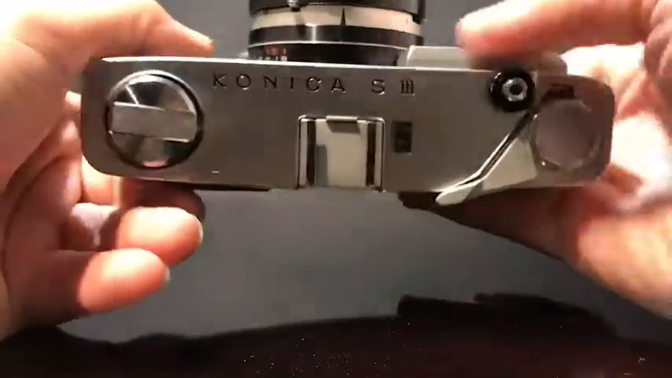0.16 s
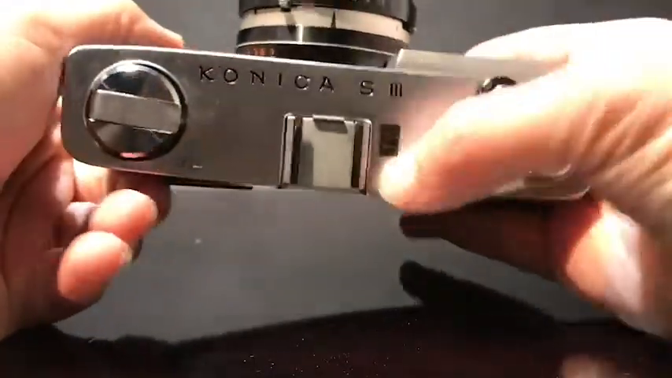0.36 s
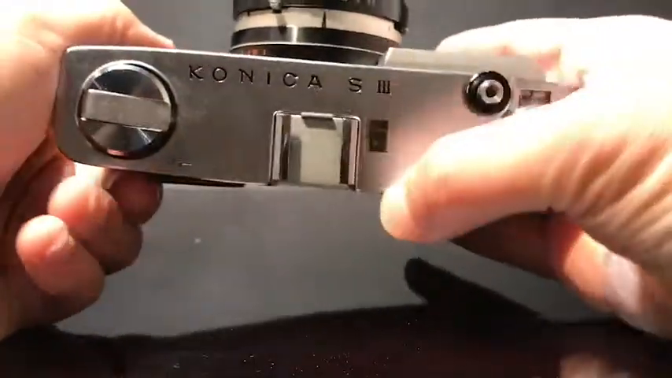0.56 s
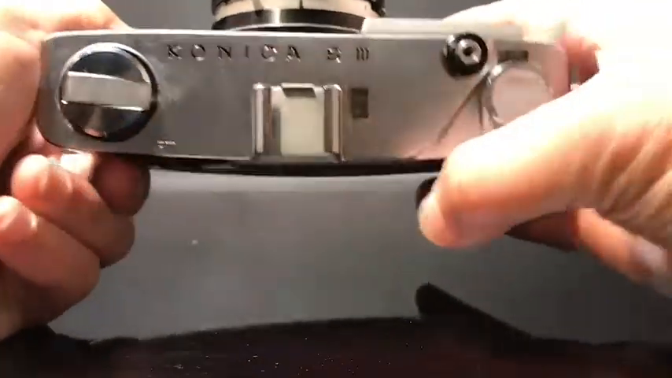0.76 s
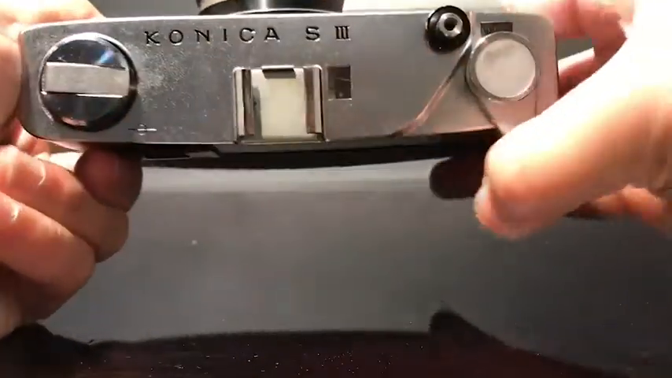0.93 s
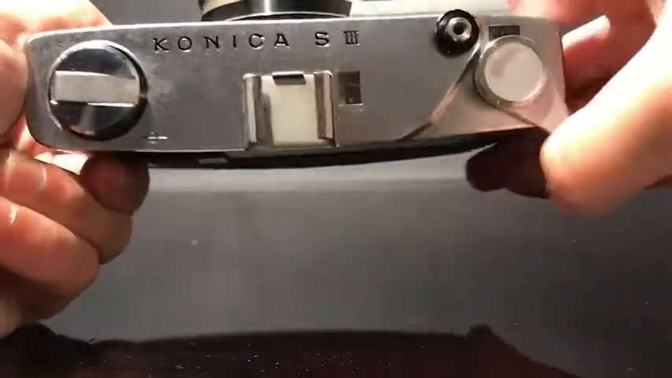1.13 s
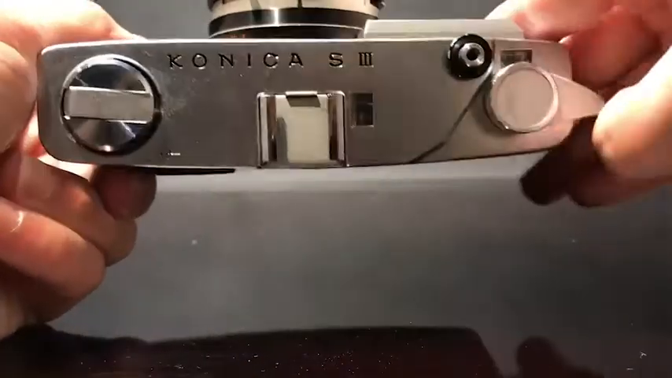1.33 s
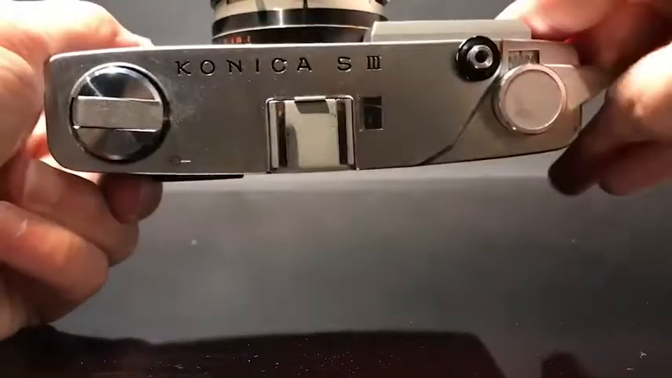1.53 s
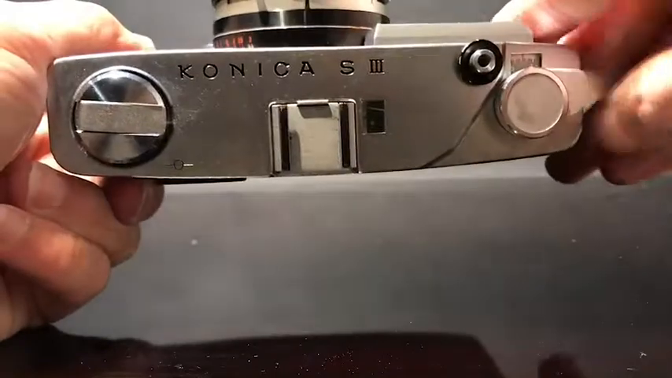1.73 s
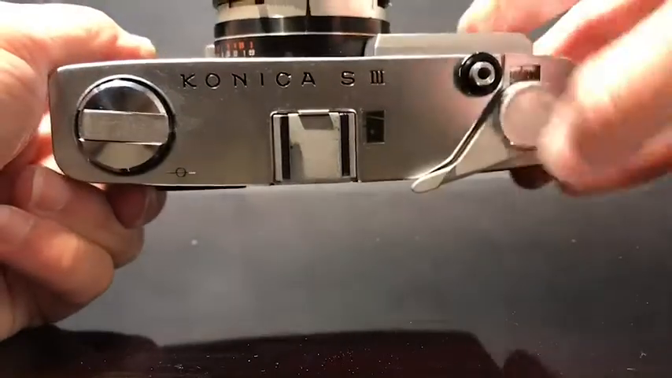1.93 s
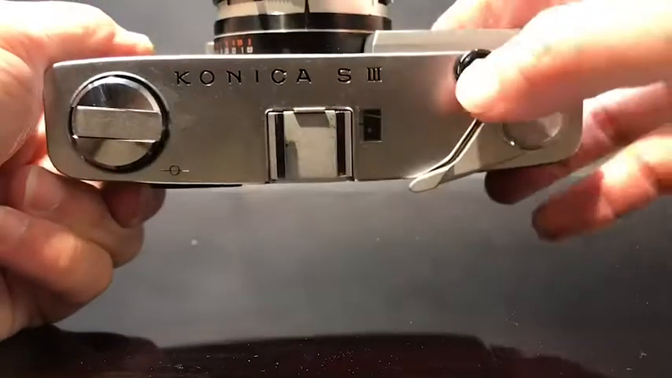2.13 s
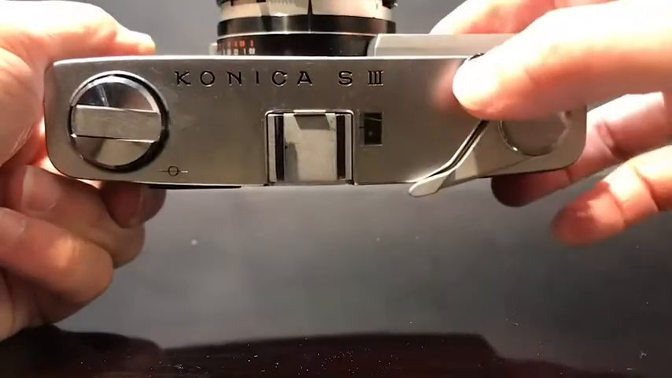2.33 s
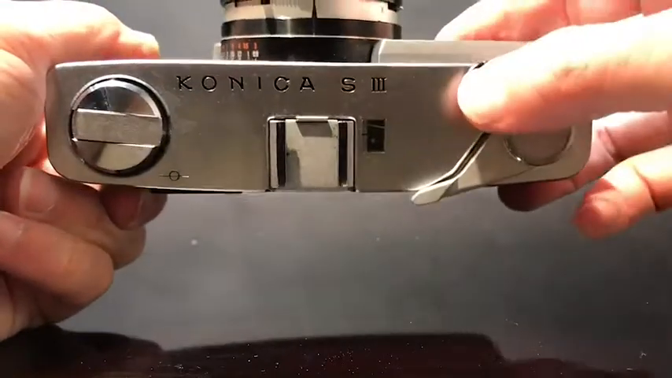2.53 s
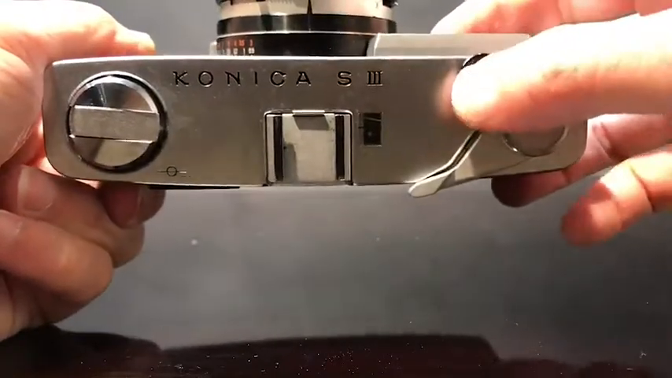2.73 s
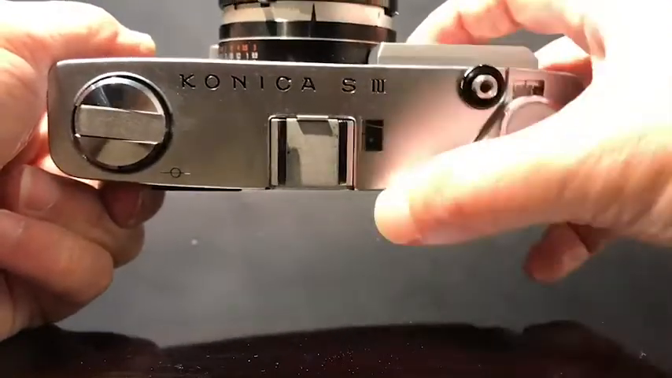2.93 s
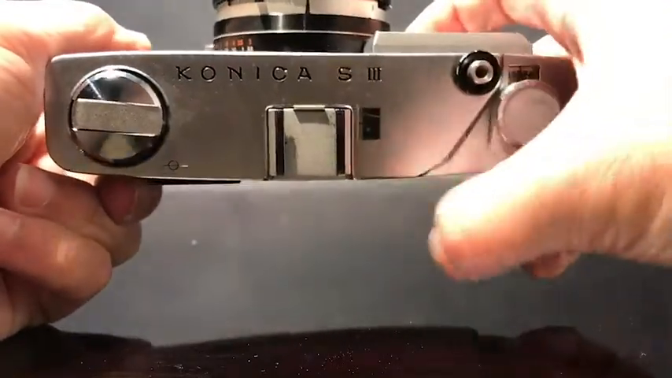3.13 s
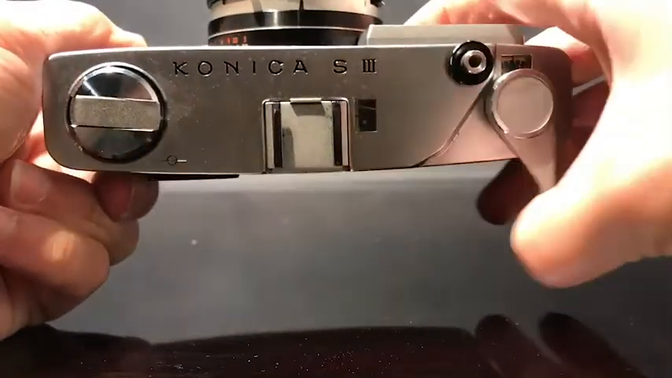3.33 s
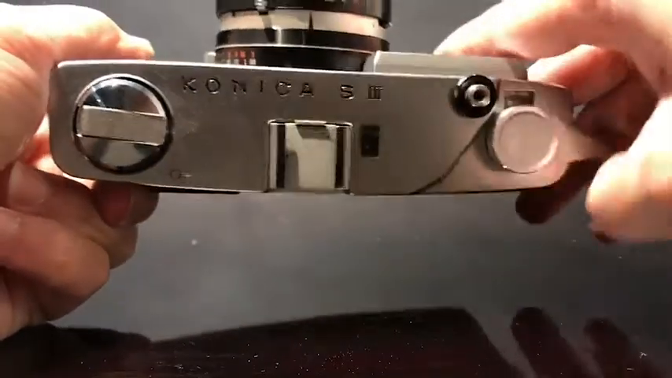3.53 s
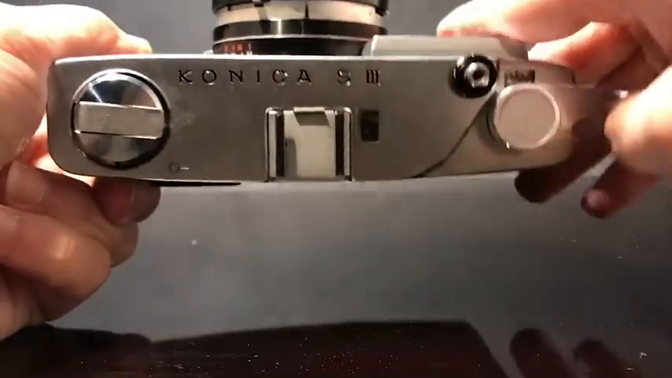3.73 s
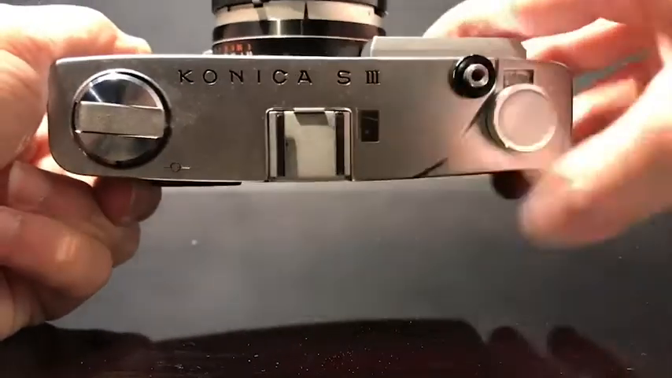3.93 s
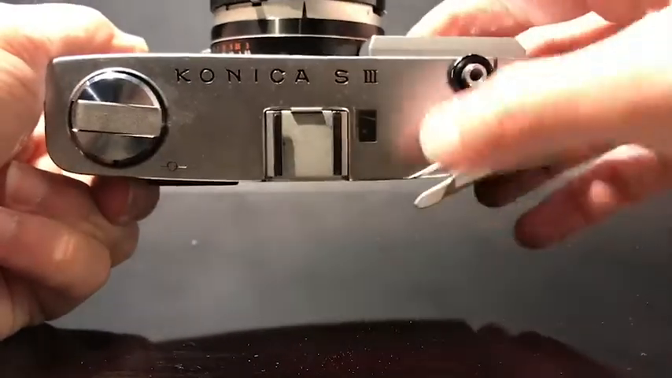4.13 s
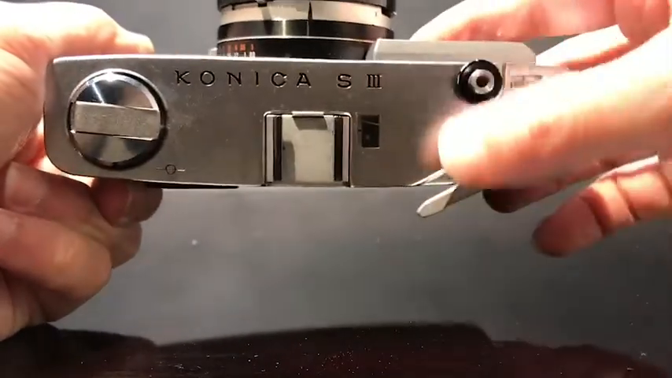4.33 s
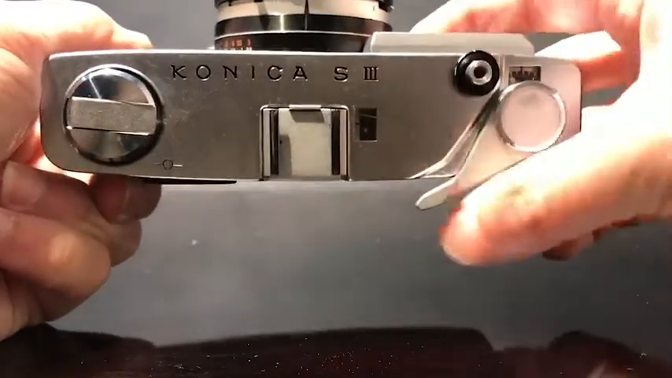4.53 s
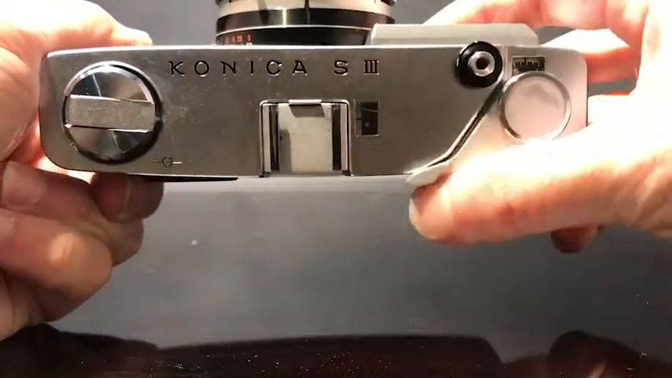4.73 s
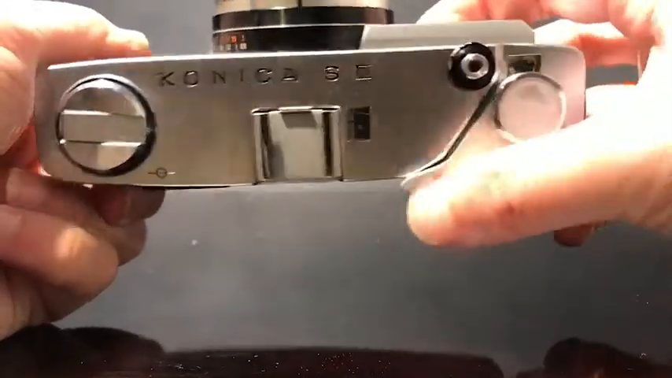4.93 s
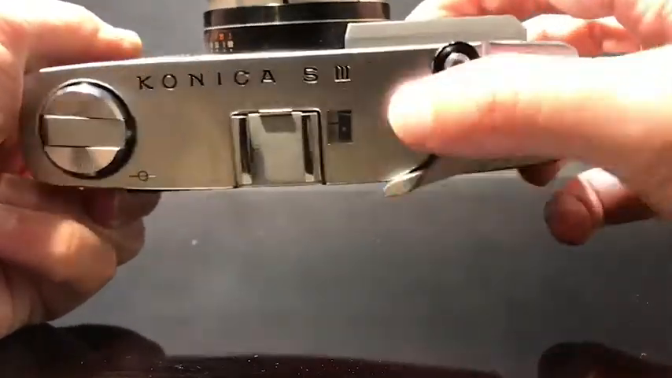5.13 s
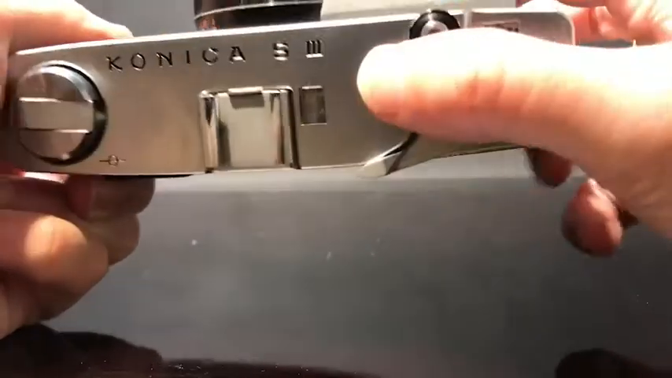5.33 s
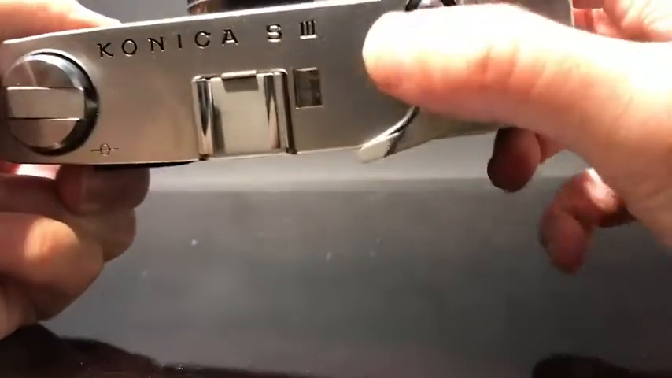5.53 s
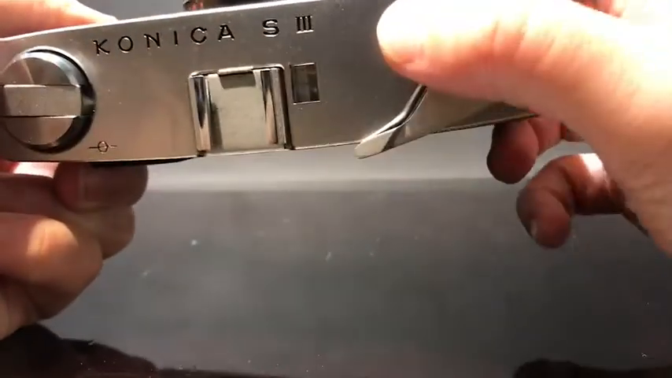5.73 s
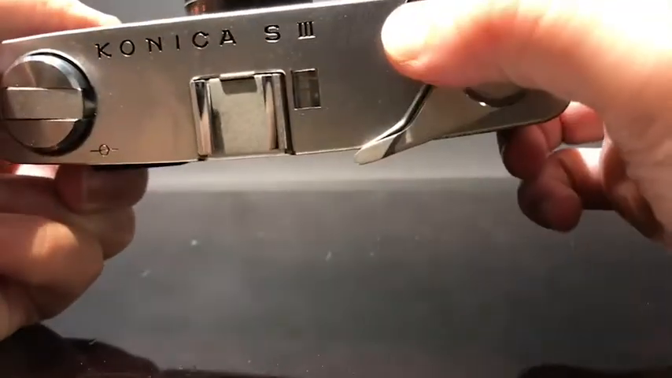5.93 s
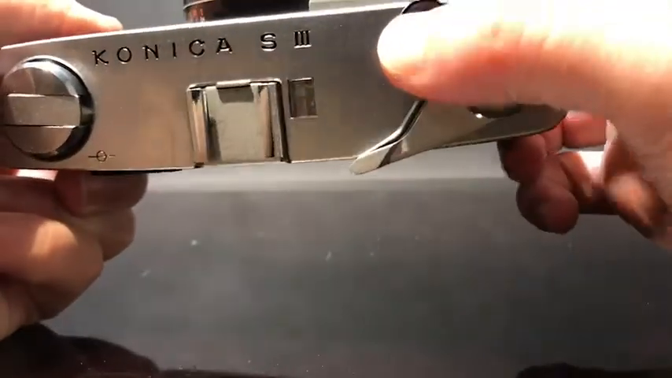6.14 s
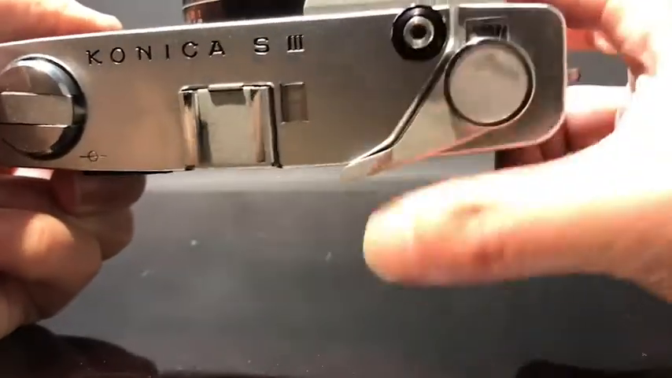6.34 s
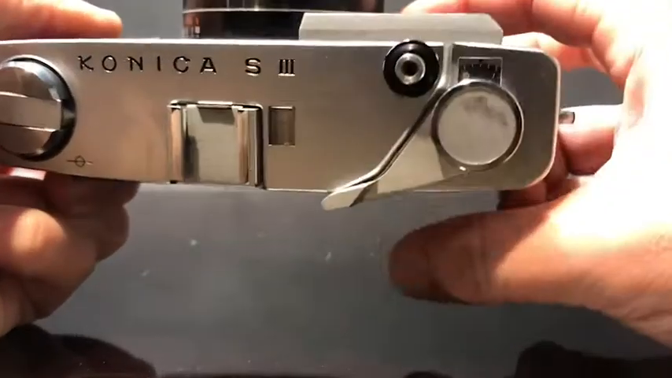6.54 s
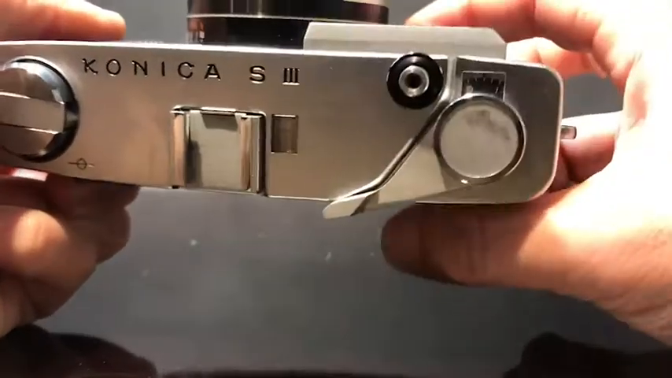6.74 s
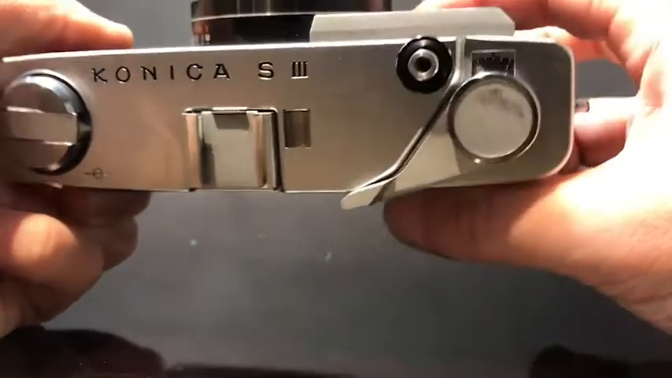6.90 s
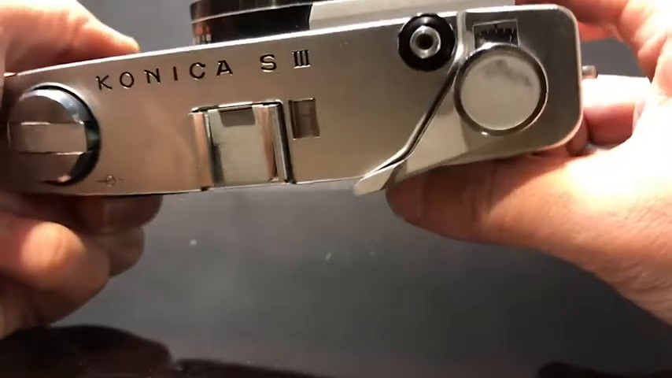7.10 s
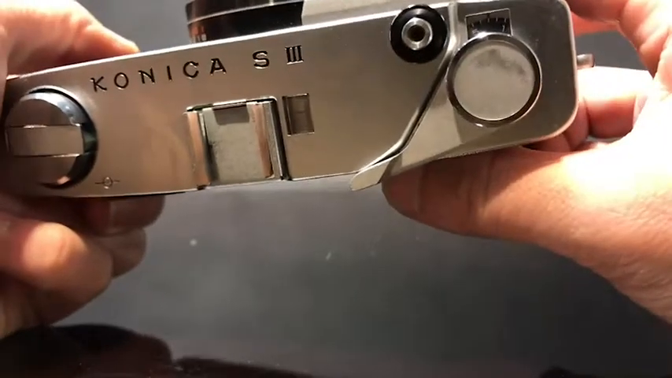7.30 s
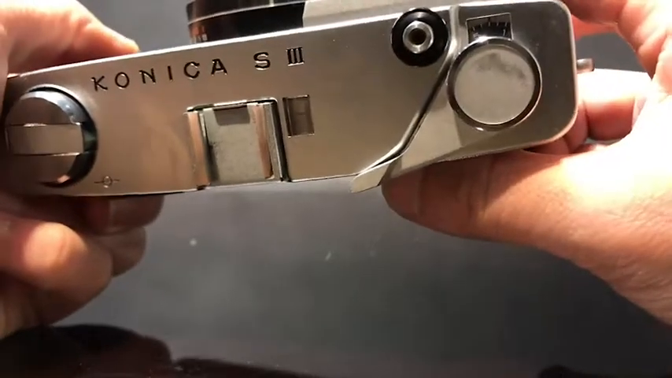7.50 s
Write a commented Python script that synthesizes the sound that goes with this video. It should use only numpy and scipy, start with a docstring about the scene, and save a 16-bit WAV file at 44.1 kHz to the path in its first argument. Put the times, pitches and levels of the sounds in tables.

```python
"""Winding and firing a film camera

A metal camera is worked close to a small microphone in a quiet room. The winding lever ticks over
its ratchet and snaps home, thumping the microphone; the shutter runs and slams; the release springs
back; fingers rub the body. Most metal sounds are a tap plus a burst of noise ringing in the body."""
import sys
import numpy as np
from scipy import signal
from scipy.fft import rfft, irfft
from scipy.io import wavfile

SR = 44100
rng = np.random.default_rng(int(sys.argv[2]) if len(sys.argv) > 2 else 0)


def store_pcm(level_fs):
    """Save levels as 16-bit WAV."""
    pcm = np.round(np.clip(level_fs, -1, 1) * 32767).astype(np.int16)
    wavfile.write(sys.argv[1], SR, np.atleast_2d(pcm).T)


N = 333660

# The room's steady noise: (frequency [Hz], relative level [dB])
ROOM_SPECTRUM = [(12, -28.5), (20, -6.5), (60, 0.5), (91, -20), (130, -2), (168, -21), (198, -7),
                 (328, -19), (388, -10.5), (422, -36), (624, -20.5), (1660, -25.5), (2530, -27.5),
                 (14300, -42.5), (16000, -57)]
ROOM_DB, CUTOFF_HZ = -56.5, 16350
# Hands on the camera: (time [s], grip creak [dB], finger rub [dB], skin hiss [dB])
HANDS = [(0.0, -58.5, -61, -64), (0.44, -60, -62, -67.5), (0.52, -58, -58, -61.5), (0.66, -58, -62.5, -65),
         (0.84, -62.5, -61, -72), (1.6, -64.5, -70, -67.5), (1.98, -61, -64, -63), (2.11, -61, -54.5, -59),
         (2.42, -58.5, -60, -69), (2.9, -57.5, -70, -66), (3.12, -57.5, -63, -78), (3.7, -60, -66.5, -67),
         (4.0, -55, -78, -67.5), (4.36, -60, -48, -66), (4.5, -58, -62, -69), (4.58, -59, -62.5, -59.5),
         (4.68, -60, -71.5, -67), (5.039, -61, -70.5, -79), (6.0, -66.5, -69.5, -77),
         (7.18, -64.5, -69, -90.5), (7.35, -65, -64, -63.5), (7.57, -65, -66, -69)]
# Gears rub as the lever winds, loudest as the stroke ends:
# (start [s], a point in mid-stroke [s], end [s], level at each of these [dB])
WINDING_STROKES = [(0.923, 1.24, 1.44, -61.5, -56.5, -53), (3.18, 3.5, 3.635, -57, -58.5, -50.5)]
# Added to the gears' level: (creak [dB], rub [dB], hiss [dB])
GEAR_COLOUR_DB = [-8, -2.5, -2]
# The grip creaks on the covering: (start [s], length [s], level [dB], pitch [Hz], width [Hz])
CREAKS = [(0.166, 0.096, -48, 270, 60), (0.456, 0.05, -47, 394, 200), (.485, 0.078, -43, 201, 197),
          (0.589, .12, -53, 400, 300), (1.193, .15, -59, 700, 300), (3.177, 0.062, -47.5, 670, 200),
          (3.441, .11, -43.5, 700, 248), (3.56, 0.1, -50.5, 700, 300), (3.975, .08, -46.5, 420, 300),
          (4.261, 0.059, -41.5, 220, 202), (4.928, 0.079, -57, 930, 590)]
# The lever slams home. A "fade" is always the time to die away by 60 dB.
# (time [s], knock [dB], boom [dB], first pitch [Hz], last pitch [Hz], glide [s], fade [s])
THUMPS = [(1.8464, -15, 1.5, 376, 50.8, 0.0027, 0.077), (3.973, -16.5, -15, 680, 59.9, 0.0031, 0.049)]

# Where the camera's body rings: (pitch [Hz], width [Hz], level [dB])
BODY_RINGS = [(665, 260, 1), (1135, 350, 1), (1450, 830, 3.5), (2390, 130, 1.5), (2890, 240, 2),
              (3700, 800, 3), (4375, 190, -2), (5420, 400, -4), (6330, 500, -5), (7530, 2200, -0.5),
              (9070, 1100, -3.5), (10000, 6100, -5.5), (11450, 1700, -2.5), (13770, 900, -2),
              (17300, 320, 4)]
# Five pitch ranges, highest first: (lower edge [Hz]). A "colour" adds a level to each range.
RANGE_EDGES_HZ = [9000, 4500, 3100, 1800, 0]
# A "tilt" makes a sound brighter (+) or duller (-): (share of the tilt in each range)
TILT_SHARE = [0.73, 0.87, 0, -0.16, -0.42]
# The room's echo in each range: (level [dB]) and (fade [s])
ECHO_DB = [-43.5, -44.5, -40, -43, -46]
ECHO_FADE_S = [0.2, 0.26, 0.32, 0.21, 0.25]
# Colours of the pawl (the ratchet's catch) and of sliding parts: (level in each range [dB])
PAWL_COLOUR_DB = [-1.5, -14, -17.5, -23, -23.5]
SLIDE_COLOUR_DB = [3, 3, -1, -2, -2.5]
# Kinds of hit: (colour [dB], fade of the chatter [s])
TICK_HIT = [1, -1.5, -13, -17, -19], 0.016
HOME_HIT = [4.5, -0.5, -6.5, -7, -7], .01
LATCH_HIT = [-3.5, -5, -6, -15, -13.5], .02
FINGER_HIT = [1, 1, 2, 1.5, -2.5], 0.013
FIRST_BLADE_HIT = [-0.5, -2, -14, -23.5, -18.5], .007
SECOND_BLADE_HIT = [3.5, -2, -2, -16.5, -16.5], 0.0089
BOUNCE_HIT = [-1, -2.5, -4, -10.5, -10.5], 0.019
ROD_HIT = [-0.5, -3, -15, -0.5, -23], 0.0078
# How far a hit's clean tap stands above its chatter: (level in each range [dB])
TAP_BOOST_DB = [5.99, 13.4, 3.8, 9.1, 20.24]

# The pawl drops over a ratchet tooth: (time [s], level [dB])
RATCHET_TICKS = [(0.83, -22.5), (0.862, -22.5), (0.892, -23.5), (0.9326, -21.5), (0.974, -24),
                 (0.9928, -20), (1.0104, -22), (1.0449, -23), (1.08, -22.5), (1.114, -23.5), (1.17, -24),
                 (1.1961, -21.5), (1.1994, -19.5), (1.217, -21), (1.2272, -21.5), (1.2354, -25),
                 (1.2612, -26.5), (1.286, -21), (1.3075, -16.5), (1.3391, -20), (1.3798, -24.5),
                 (1.4113, -20), (1.4325, -21.5), (3.202, -22.5), (3.2282, -21.5), (3.254, -21),
                 (3.288, -23), (3.3239, -24), (3.3433, -20), (3.3495, -21.5), (3.3753, -23.5),
                 (3.4054, -23), (3.4234, -21), (3.429, -23), (3.4449, -20), (3.46, -22.5), (3.474, -20),
                 (3.486, -21.5), (3.4954, -14.5), (3.507, -30), (3.5225, -17), (3.5383, -22),
                 (3.5677, -19.5), (3.5952, -20.5), (3.614, -22), (3.6214, -29)]
PAWL_WEIGHT, PAWL_VARIES_DB = .8, 2.5   # harder ticks sound fuller; each tooth has its own colour
# The pawl's spring: (pitch [Hz], width [Hz], level [dB])
PAWL_SPRING = (6500, 300, -21)
# The shutter spring latches in mid-stroke: (time [s], level [dB])
LATCHES = [(1.3105, -25), (3.5246, -23.5)]
# That spring rings on: (pitch [Hz], fade [s], added level [dB])
LATCH_RING = (3400, .12, -9)
# The free lever takes up slack or skips back over its teeth: (time [s], level [dB], tilt [dB])
LEVER_TICKS = [(0.7109, -29, -0.5), (1.741, -62, 9), (1.7804, -54, -1), (1.8331, -19, -1),
               (1.8388, -21, -12), (3.1171, -27.5, 1), (3.837, -53.5, 2.5), (3.875, -54, 1.5),
               (3.897, -50.5, 0.5), (3.9369, -25.5, 1.5), (3.953, -27, 5), (3.9637, -25, -2.5),
               (3.9686, -24, 2.5), (4.723, -21.5, 3)]
# The lever hits its rest: (time [s], snap [dB], chatter [dB])
LEVER_HOME = [(1.8445, -5, -14.5), (1.8466, -3.5, -13.5), (3.9726, -1, -11)]
SNAP_HALF_WIDTH_S, SNAP_LAG_S = .00006, .0009   # the snap comes just after the chatter starts
# A finger taps or presses the metal: (time [s], level [dB], tilt [dB])
PRESSES = [(0.3145, -53.5, -20), (1.8228, -44, 4), (2.3735, -61, 6), (4.206, -44, 7.5),
           (4.266, -41.5, -7.5), (4.2713, -27, -5)]
# Parts sliding: (start [s], end [s], start level [dB], end level [dB], tilt [dB])
SLIDES = [(3.448, 3.538, -49.5, -47, 2), (3.976, 3.983, -50, -33.5, -16), (4.268, 4.316, -34, -47.5, -15.5),
          (4.968, 4.994, -72, -70, 10), (5.741, 5.769, -63.5, -52.5, 0.5)]

# The shutter fires: (time [s], first blade [dB], second blade [dB], delay of the bounce [s])
FIRINGS = [(2.5288, -10.5, -8, .0116), (5.9652, -3.5, -9.5, .0155)]
RUN_UP_S, RUN_UP_DB, GEAR_TEETH_HZ = .0235, (-37.5, -32.5), 370   # gears buzz before the slam
SECOND_BLADE_LAG_S, BOUNCE_DB = 0.0016, -19.5
RATTLE_S, RATTLE_DB = (0.0028, 0.0073), (-35.5, -46)   # after the bounce: (from, to)
# The housing answers each slam: (pitch [Hz], fade [s], level [dB], delay [s])
SHUTTER_KNOCK = (600, 0.03, -23.5, .0025)
# The release springs back: (time [s], level [dB], lead of the latch tick [s], tick [dB], bounce [dB])
SPRING_BACK = [(2.7777, -9, 0.0021, -16.5, -27), (4.3202, -8.5, .002, -30.5, -21.5),
               (6.214, -8, 0.0052, -33.5, -12)]
CREEP_S, CREEP_DB = 0.038, (-61.5, -50.5)   # the rod creeps up before it lets go
ROD_BOUNCE_S, SETTLE_S, SETTLE_DB = .0045, (.01, 0.023), (-42.5, -47.5)
# The release rod knocks on its stop:
# (time [s], level [dB], pitch ratio set by the finger's grip, hardness [dB per octave])
ROD_KNOCKS = [(0.3165, -40, 1.004, -9.5), (2.7783, -7.5, 1.015, 4), (4.322, -11, 1.03, 3.5),
              (6.2153, -8.5, 1.155, 2)]
# The rod's own tones: (pitch [Hz], level [dB], fade [s])
ROD_TONES = [(620, -17, 0.051), (1085, -5, 0.029), (2235, 0, .015), (2742, -0.5, 0.013), (5330, -4, 0.011),
             (7870, 3.5, 0.0057), (9720, 0, .007), (2245, -29, 0.17), (2780, -29.5, 0.14)]


def from_db(db):
    """Turn decibels into a number to multiply by."""
    return 10 ** (np.asarray(db) / 20)


def rms_one(x):
    """Scale a sound to an average strength (rms) of 1."""
    return x / np.sqrt(np.mean(x ** 2) + 1e-20)


def band(x, low_hz, high_hz):
    """Keep what lies between two frequencies."""
    return signal.sosfilt(signal.butter(2, [low_hz, high_hz], "band", fs=SR, output="sos"), x)


def resonance(x, hz, width_hz):
    """Make a sound ring near one pitch; noise comes out equally strong at any width."""
    r = np.exp(-np.pi * width_hz / SR)
    gain = np.sqrt((1 - r * r) / 8)
    return signal.lfilter([gain, 0, -gain], [1, -2 * r * np.cos(2 * np.pi * hz / SR), r * r], x + 1e-18)


def ring(hz, fade_s):
    """A pure tone that dies away."""
    t = np.arange(int(.16 * SR)) / SR
    return np.sin(2 * np.pi * hz * t) * from_db(-60 * t / fade_s)


def room_tone():
    """Steady ventilation rumble and microphone hiss."""
    hz = np.maximum(np.fft.rfftfreq(N, 1 / SR), 1)
    points_hz, points_db = np.transpose(ROOM_SPECTRUM)
    shape = from_db(np.interp(np.log(hz), np.log(points_hz), points_db))
    return from_db(ROOM_DB) * rms_one(irfft(rfft(rng.standard_normal(N)) * shape, N))


def rubbing():
    """Hands and winding gears rub, making grainy low, middle and high noise."""
    times, *levels_db = np.transpose(HANDS)
    t = np.arange(N) / SR
    gears = sum(from_db(np.interp(t, row[:3], row[3:], left=-200, right=-200))
                for row in WINDING_STROKES)
    creak, rub, hiss = (np.hypot(from_db(np.interp(t, times, db)), from_db(gear_db) * gears)
                        for db, gear_db in zip(levels_db, GEAR_COLOUR_DB))
    slips = rng.standard_normal((3, N))
    slips *= from_db(2.7 * rng.standard_normal((3, N // 128 + 1))).repeat(128, axis=1)[:, :N]   # grain
    return (creak * rms_one(band(slips[0], 91, 730)) + rub * rms_one(band(slips[1], 600, 3500))
            + hiss * rms_one(band(slips[2], 3200, 14000)))


def creaks():
    """The grip sticks and slips: dull noise that swells and fades."""
    out = np.zeros(N)
    for start, length, db, hz, width_hz in CREAKS:
        i, size = round(start * SR), round(length * SR)
        rough = rms_one(resonance(rng.standard_normal(SR // 4), hz, width_hz))[:size]
        out[i:i + size] += from_db(db) * rough * np.sqrt(np.hanning(size))
    return out


def room_echo(chatter, taps):
    """How strong the echo is in each range: the room stores energy and lets it die away."""
    decays = from_db(-120 / (np.array(ECHO_FADE_S) * SR))
    build = np.exp(-1 / (0.0023 * SR))   # the first reflections take a moment to arrive
    stored = [signal.lfilter([1 - build], np.convolve([1, -decay], [1, -build]), power + 1e-18)
              for decay, power in zip(decays, chatter ** 2 + taps ** 2)]
    return from_db(ECHO_DB)[:, None] * np.sqrt(np.abs(stored))


def plucked_spring(events, hz, width_hz, gain_db, fade_s):
    """Each pluck sets a spring sizzling: fading noise around one pitch."""
    plucks = np.zeros(N)
    for s, db in events:
        plucks[round(s * SR)] = from_db(db + gain_db)
    shiver = signal.lfilter([1], [1, -from_db(-60 / (fade_s * SR))], plucks + 1e-18)
    return resonance(shiver * rng.standard_normal(N), hz, width_hz)


def springs():
    """The pawl's spring pings at each tooth; the shutter's spring rings thinly as it latches."""
    pawl = plucked_spring(RATCHET_TICKS, *PAWL_SPRING, fade_s=0.06)
    hz, fade_s, db = LATCH_RING
    return pawl + plucked_spring(LATCHES, hz, width_hz=250, gain_db=db, fade_s=fade_s)


def shutter_knock():
    """The housing rings dully just after the blades slam and bounce."""
    out = np.zeros(N)
    hz, fade_s, db, lag = SHUTTER_KNOCK
    knock = ring(hz, fade_s)
    for s, _, _, delay in FIRINGS:
        for start, loss_db in ((s + lag, 0), (s + lag + delay, -5)):
            i = round(start * SR)
            out[i:i + len(knock)] += from_db(db + loss_db) * knock
    return out


def lever_thumps():
    """The returning lever jolts the microphone: a dull knock and a tone that drops fast to a boom."""
    out, t = np.zeros(N), np.arange(int(.2 * SR)) / SR
    knock = ring(hz=900, fade_s=0.011)
    for s, knock_db, boom_db, first_hz, last_hz, glide_s, fade_s in THUMPS:
        hz = last_hz + (first_hz - last_hz) * np.exp(-t / glide_s)
        boom = np.sin(2 * np.pi * np.cumsum(hz) / SR) * (1 - np.exp(-t / 0.0018))
        i = round(s * SR)
        out[i:i + len(t)] += from_db(boom_db - 60 * t / fade_s) * boom
        out[i:i + len(knock)] += from_db(knock_db) * knock
    return out


def lever_snaps():
    """Each stop of the lever sends out one short swing of air pressure, down then up."""
    out, x = np.zeros(N), np.arange(-40, 41) / SR / SNAP_HALF_WIDTH_S
    for s, snap_db, _ in LEVER_HOME:
        i = round(s * SR) - 40
        out[i:i + len(x)] += from_db(snap_db) * x * np.exp(.5 - x ** 2 / 2)
    return out


def release_rod():
    """One clean blow rings the rod's few tones; a softer blow reaches the high ones less."""
    out = np.zeros(N)
    for s, db, ratio, hardness in ROD_KNOCKS:
        clack = sum(from_db(db + tone_db + hardness * np.log2(hz / 2500))
                    * ring(hz * ratio, fade_s) * (-1) ** k
                    for k, (hz, tone_db, fade_s) in enumerate(ROD_TONES))
        rise = 1 - np.exp(-np.arange(len(clack)) / (.0005 * SR))
        i = round(s * SR)
        out[i:i + len(clack)] += clack * rise
    return out


def add_slide(chatter, start, end, levels_db, tilt_db, buzz_db=0):
    """Parts scrape, moving from one level to another; gear teeth can add a buzz."""
    i, j = round(start * SR), round(end * SR)
    teeth_db = -buzz_db * (np.arange(j - i) * GEAR_TEETH_HZ / SR % 1)
    colour_db = np.array(SLIDE_COLOUR_DB) + tilt_db * np.array(TILT_SHARE)
    chatter[:, i:j] += from_db(colour_db[:, None] + np.linspace(*levels_db, j - i) + teeth_db)


def add_hit(chatter, taps, s, db, kind, tilt_db=0, rise_s=.0006):
    """Metal is struck: one tap, and chatter that rises quickly and falls ever faster."""
    colour_db, fade_s = kind
    levels_db = db + np.array(colour_db) + tilt_db * np.array(TILT_SHARE)
    t = np.arange(int(.06 * SR)) / SR
    shape = (1 - np.exp(-t / rise_s)) * from_db(-60 * (t / fade_s) ** 1.414)
    i = round(s * SR)
    chatter[:, i:i + len(t)] += from_db(levels_db)[:, None] * shape
    taps[:, i + round(rise_s * SR)] += from_db(levels_db + TAP_BOOST_DB)


def add_handling(chatter, taps):
    """Fingers tap the metal and parts slide."""
    for s, db, tilt_db in PRESSES:
        add_hit(chatter, taps, s, db, FINGER_HIT, tilt_db)
    for start, end, *levels_db, tilt_db in SLIDES:
        add_slide(chatter, start, end, levels_db, tilt_db)


def add_release(chatter, taps):
    """The release rod creeps up, unlatches, hits its stop, bounces and settles."""
    for s, db, lead, tick_db, bounce_db in SPRING_BACK:
        add_slide(chatter, s - CREEP_S, s, CREEP_DB, tilt_db=-6.5)
        add_hit(chatter, taps, s - lead, tick_db, ROD_HIT)
        add_hit(chatter, taps, s, db, ROD_HIT)
        add_hit(chatter, taps, s + ROD_BOUNCE_S, bounce_db, ROD_HIT)
        add_slide(chatter, *(s + np.array(SETTLE_S)), SETTLE_DB, tilt_db=-12)


def add_winding(chatter, taps):
    """The pawl ticks over the teeth, the spring latches, and the lever skips back home."""
    for s, db in RATCHET_TICKS:
        weight_db = PAWL_WEIGHT * (db + 21) * np.array([0, 0, 1, 1, 1])   # lower ranges only
        colour_db = PAWL_COLOUR_DB + weight_db + rng.normal(0, PAWL_VARIES_DB, len(weight_db))
        add_hit(chatter, taps, s, db, kind=(colour_db, 0.0094), rise_s=0.00086)
    for s, db in LATCHES:
        add_hit(chatter, taps, s, db, LATCH_HIT)
    for s, db, tilt_db in LEVER_TICKS:
        add_hit(chatter, taps, s, db, TICK_HIT, tilt_db)
    for s, _, chatter_db in LEVER_HOME:
        add_hit(chatter, taps, s - SNAP_LAG_S, chatter_db, HOME_HIT)


def add_shutter(chatter, taps):
    """Gears run up, then two blades slam, bounce and rattle."""
    for s, first_db, second_db, delay in FIRINGS:
        add_slide(chatter, s - RUN_UP_S, s - .002, RUN_UP_DB, tilt_db=7, buzz_db=6)
        add_hit(chatter, taps, s, first_db, FIRST_BLADE_HIT)
        add_hit(chatter, taps, s + SECOND_BLADE_LAG_S, second_db, SECOND_BLADE_HIT)
        add_hit(chatter, taps, s + delay, BOUNCE_DB, BOUNCE_HIT)
        add_slide(chatter, *(s + delay + np.array(RATTLE_S)), RATTLE_DB, tilt_db=-5)


def camera_body():
    """Taps, gritty chatter and the room's echo ring in the body, each ring fed by its own range."""
    chatter, taps = np.zeros((2, len(RANGE_EDGES_HZ), N))   # strength over time, a row for each range
    for add_part in (add_handling, add_release, add_winding, add_shutter):
        add_part(chatter, taps)
    echo = room_echo(chatter, taps)
    grit = rng.standard_normal((3, N)) * from_db(2 * rng.standard_normal(N // 32 + 1)).repeat(32)[:N]
    smooth_noise = rng.standard_normal((3, N))
    out = np.zeros(N)
    for k, (hz, width_hz, db) in enumerate(BODY_RINGS):
        row = np.argmax(hz >= np.array(RANGE_EDGES_HZ))
        drive = chatter[row] * grit[k % 3] + echo[row] * smooth_noise[k % 3] + taps[row] * (-1) ** k
        out += from_db(db) * resonance(drive, hz, width_hz)
    return out


def scene():
    """Mix the camera, the hands and the room into one channel."""
    bass_cut = signal.butter(3, 330, "high", fs=SR, output="sos")   # a small object gives off no bass
    metal = signal.sosfilt(bass_cut, camera_body() + release_rod() + shutter_knock() + springs())
    return (metal + lever_snaps() + lever_thumps() + rubbing() + creaks() + room_tone())[None]


def record(dry):
    """Automatic volume control dips after loud sounds, peaks are rounded, the top treble is cut."""
    r = np.exp(-1 / (0.083 * SR))
    smooth_power = signal.lfilter([(1 - r) ** 2], [1, -2 * r, r * r], dry ** 2)
    level_db = 10 * np.log10(smooth_power + 1e-12)
    turned_down = dry * from_db(-.25 * np.maximum(level_db + 33, 0))
    rounded = np.tanh(turned_down * 1.1) * .95
    return signal.sosfilt(signal.cheby2(22, 110, CUTOFF_HZ, fs=SR, output="sos"), rounded)


dry = scene()
out = record(dry)
store_pcm(out)
```